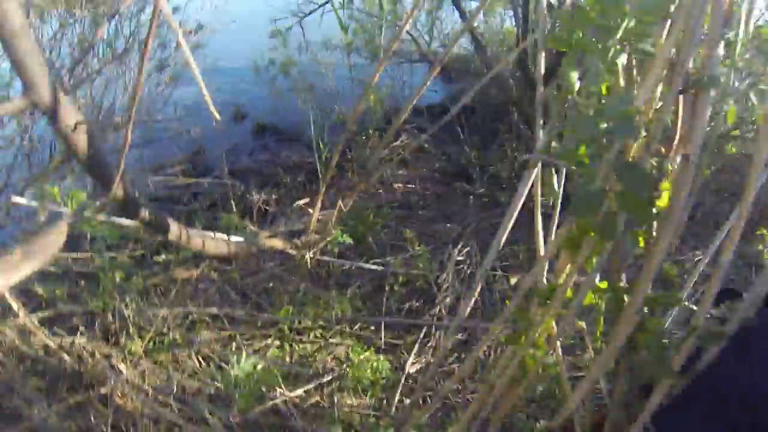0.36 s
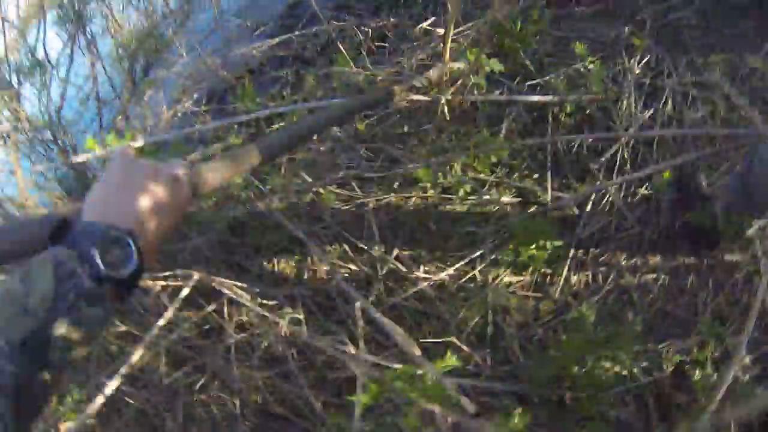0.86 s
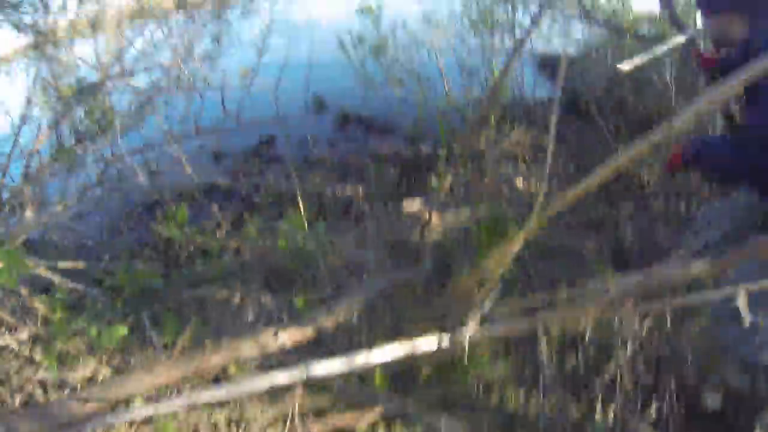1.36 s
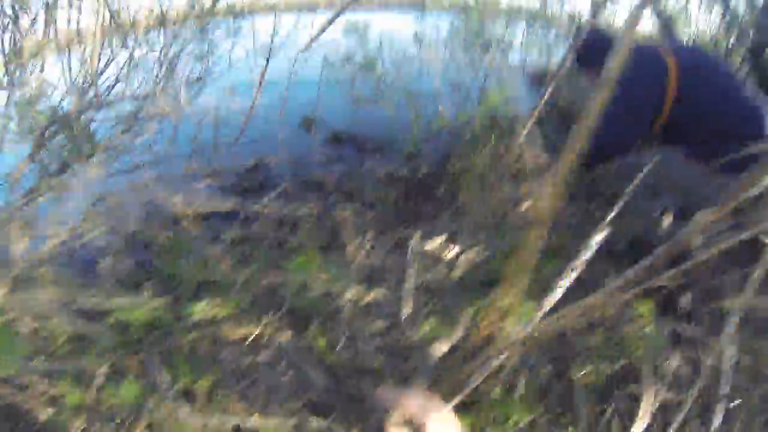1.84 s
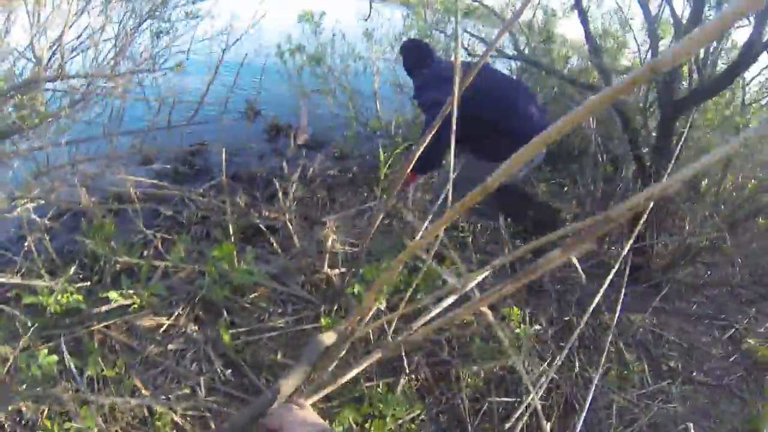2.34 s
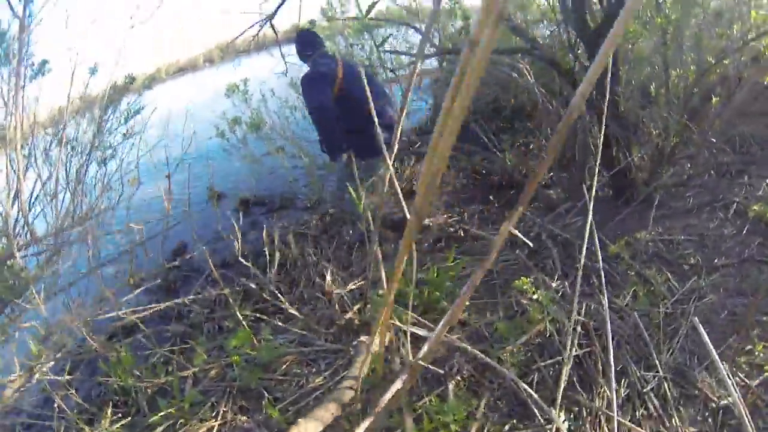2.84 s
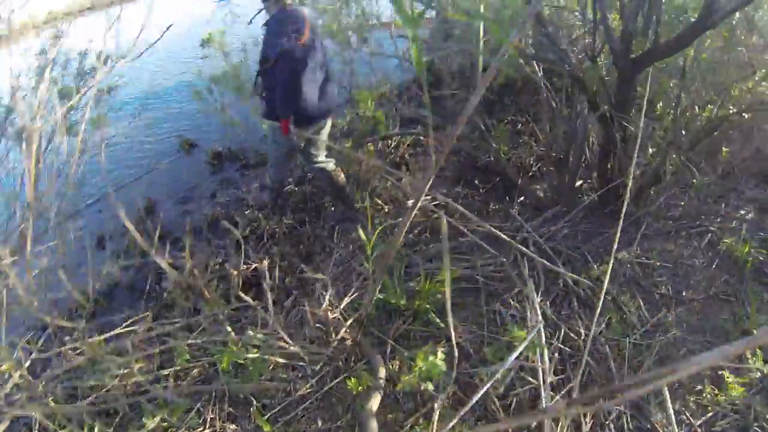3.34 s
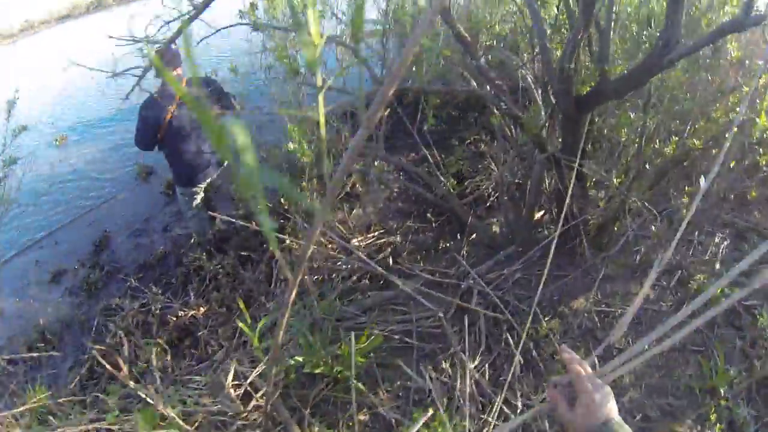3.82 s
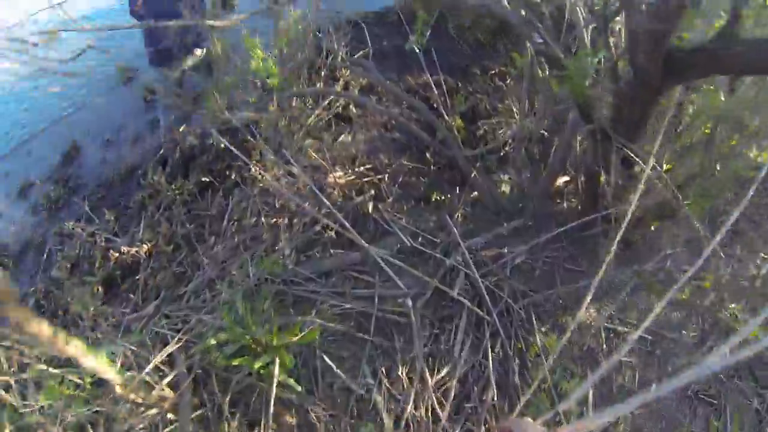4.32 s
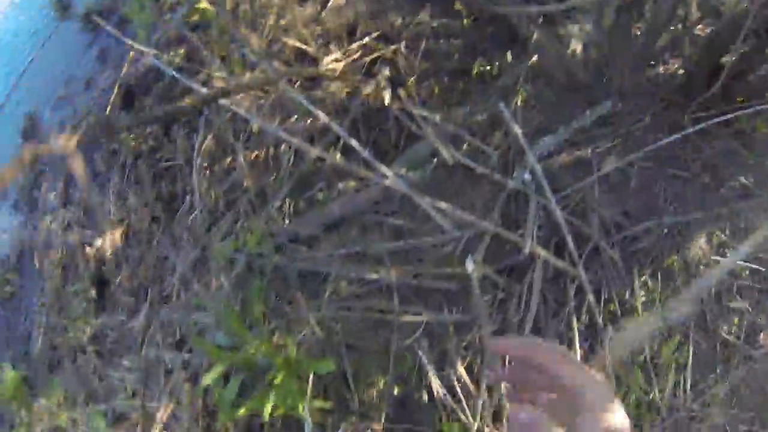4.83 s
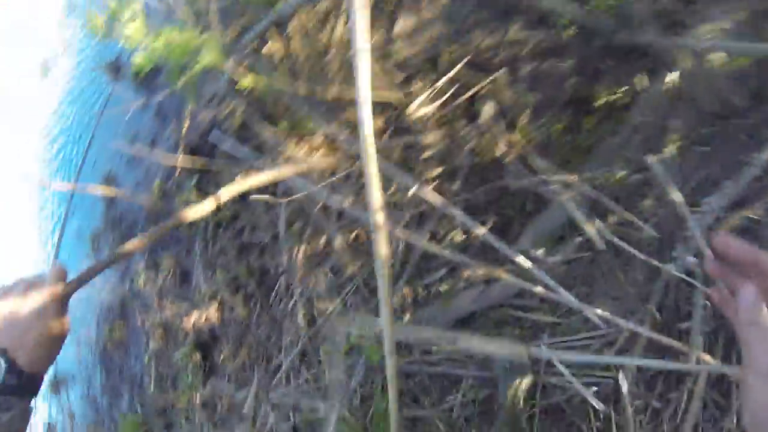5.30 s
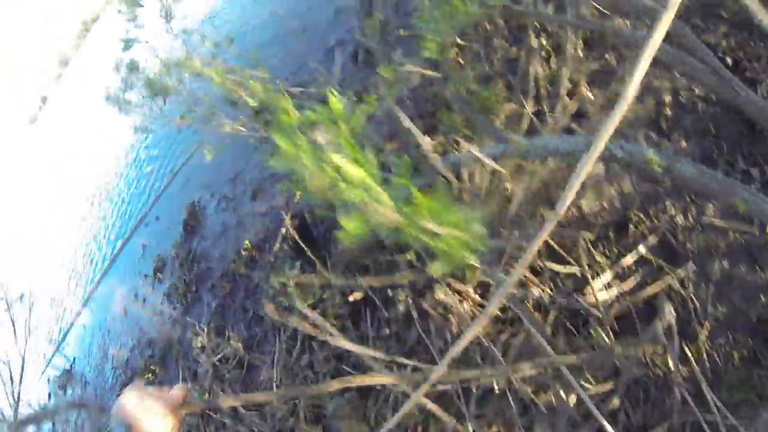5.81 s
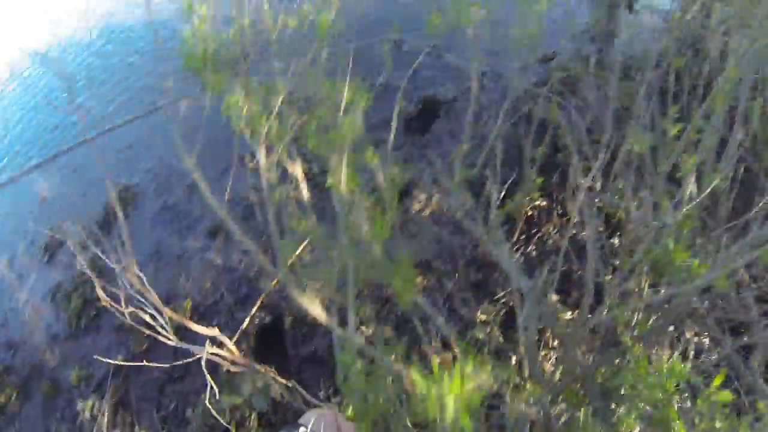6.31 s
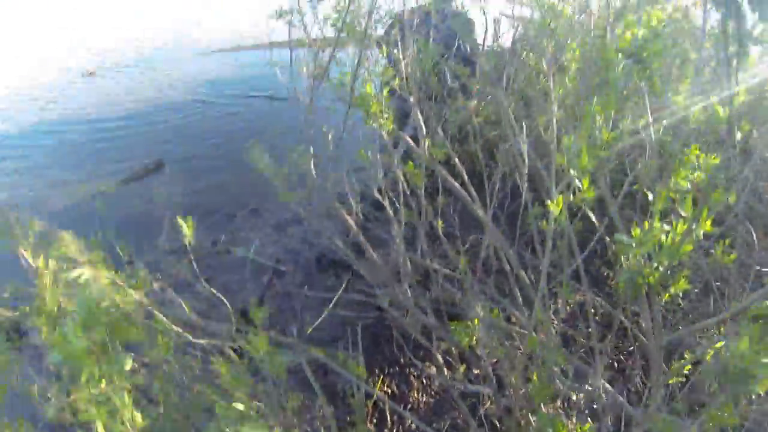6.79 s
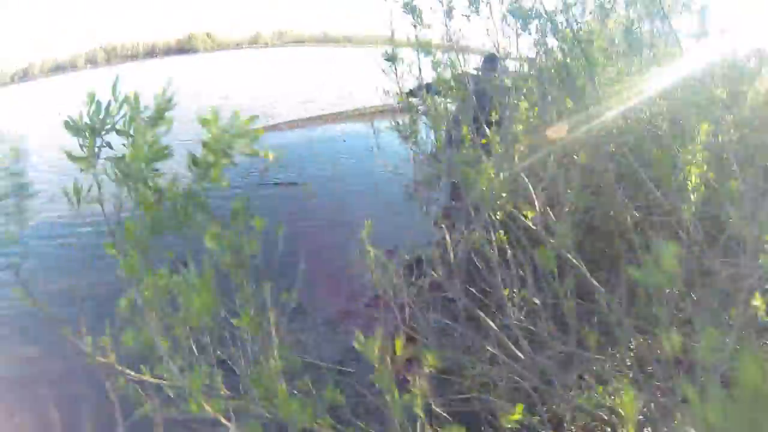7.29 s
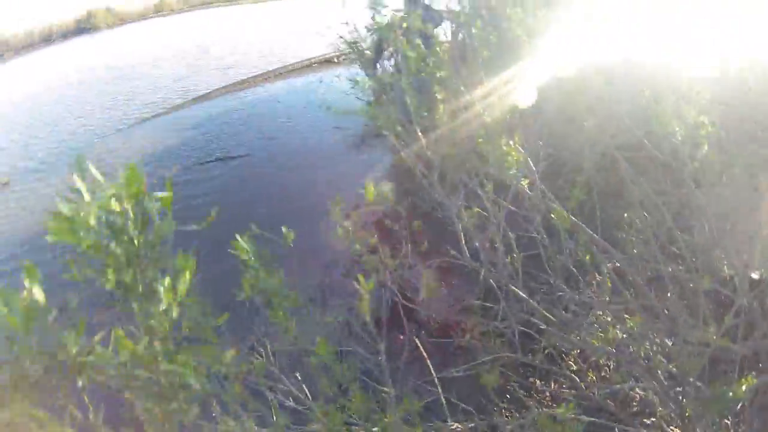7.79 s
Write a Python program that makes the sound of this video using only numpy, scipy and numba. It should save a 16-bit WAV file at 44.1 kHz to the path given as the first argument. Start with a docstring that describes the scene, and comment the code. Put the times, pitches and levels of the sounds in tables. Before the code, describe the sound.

Someone forces a way through dry cane on a bank. Heard through a small boxy housing worn on the head: bright brittle snaps, leaf rustle, hollow rattling knocks and scrapes crowded at the start, then low wind thumps and rumble between gusts. From two seconds a hog growls at intervals in the background. More snaps cluster around the middle and later; two short rising squeals come late, among softer crackle.

```python
"""In dry cane beside still water, a small head-worn camera hears through its plastic housing.
Twigs snap in reach from the start over crackling litter and leaves; stalks soon drag, whip past and knock
on the housing, then wind slaps the port between gusts. From two seconds on a hog growls further off,
and late on it squeals twice. Breaks and knocks are excited resonances, litter is random crackle, wind is
shaped noise and the growl is throat pulses; the camera's gain ducks under loud peaks, such as hard slaps."""
import sys
import numpy as np
from scipy import signal
from scipy.fft import rfft, irfft
from scipy.io import wavfile
from scipy.ndimage import uniform_filter1d
from numba import njit

SR = 44100
rng = np.random.default_rng(int(sys.argv[2]) if len(sys.argv) > 2 else 0)


def voltage_ratio(level):
    """Linear amplitude factor for a level in decibels (scalar or array-like)."""
    return 10 ** (np.asarray(level, float) / 20)


def generate_wav(sig):
    """Save sig (samples, or channels by samples) to the path in sys.argv[1] as 16-bit PCM at SR."""
    pcm = np.round(np.clip(np.atleast_2d(sig).T, -1, 1) * 32767).astype(np.int16)
    wavfile.write(sys.argv[1], SR, pcm)


N = 359415
T = np.arange(N) / SR


# twigs breaking close by, outside the housing: [t/s, ring peak level/dB, ring f/Hz, crack level against ring/dB]
TWIG_BREAKS = [(0.016, -16.5, 2400, 1), (0.101, -22.5, 3530, -7), (0.344, -9, 2800, -4),
               (0.525, -16, 1950, -5), (0.597, -13.5, 2800, 1), (0.6504, -22, 1590, -35),
               (0.771, -8, 2430, -1), (1.12, -35.5, 3940, 10), (1.2248, -11.5, 2170, -0.5),
               (1.268, -27.5, 4000, 6.5), (1.2978, -19, 2200, -20), (1.637, -29.5, 3650, 5),
               (1.7052, -12, 1830, -5), (1.796, -24, 3720, 6), (2.2769, -12, 2530, -44),
               (2.418, -22, 2450, -70), (2.443, -29, 2870, 4), (2.535, -10, 2770, -11),
               (2.637, -12, 3100, -0.5), (2.6735, -13, 3040, -8.5), (2.691, -13, 1870, -3),
               (2.918, -24.5, 4900, -1.5), (3.0005, -22, 1950, 2), (3.0306, -24.5, 4460, 7),
               (3.339, -25.5, 2430, -28), (3.4936, -26.5, 2000, -35), (3.5642, -26.5, 2300, -10),
               (3.615, -37, 3810, 11), (3.6577, -16.5, 2600, -27), (3.76, -25.5, 2410, 0),
               (3.7993, -27, 1850, -10), (3.849, -28.5, 1940, -3.5), (4.1135, -27.5, 2120, -0.5),
               (4.248, -33.5, 1630, 9.5), (4.4293, -33.5, 2500, -16), (4.4937, -8, 1850, -2),
               (4.5156, -8.5, 2000, -1.5), (4.579, -17, 4700, 2), (4.6225, -17, 1570, -2),
               (5.002, -21, 2580, 9), (5.139, -29.5, 1960, 5), (5.2014, -11, 3400, -12),
               (5.249, -26, 3300, -1), (5.3031, -20.5, 2180, 0.5), (5.5562, -16, 2500, -10.5),
               (5.637, -17, 2650, -2.5), (5.676, -13.5, 2800, -8), (5.704, -13.5, 2980, 2),
               (5.733, -15, 2560, 0.5), (5.9608, -19, 1590, -7), (6.18, -34, 3280, 4),
               (6.2787, -31, 1740, 3.5), (6.3963, -19.5, 4050, -31), (6.434, -24, 4200, 0),
               (6.81, -27, 2360, 7.5), (6.976, -32, 2860, 5), (7.4, -30.5, 1590, -23),
               (7.667, -27.5, 5330, -17), (8.128, -30, 2600, -31)]


def snaps():
    """A break is a sharp click and splintering noise; the hollow twig rings, the brush scatters a tail."""
    out, t = np.zeros(N), T[:4410]
    for s, peak_db, hz, crack_db in TWIG_BREAKS:
        noise = rng.standard_normal((2, len(t)))
        fall = np.exp(-t / (0.011 + 0.000083 * max(peak_db + 52.0, 0)))  # big breaks splinter longer
        envelope = np.exp(-t / 0.0015) + 0.22 * fall * noise[0, ::-1] ** 2
        splinters = noise[0] * envelope
        click = 4.6 * (t == 0)
        body = ring(splinters + click, hz, 320) + 0.5 * ring(splinters, 2760, 1520)
        body = ring(body, hz, 2.13 * hz)  # the wood damps the far treble
        crack = ring(noise[1] * envelope, 3740, 5700)
        both = body / np.abs(body).max() + voltage_ratio(crack_db) * crack / np.abs(crack).max()
        add(out, s, voltage_ratio(peak_db) * both)
    return out


# how hard the walker treads and pushes: [t/s, litter level/dB]
TREAD_LEVEL = [(0.0, -28.5), (0.13, -39.5), (0.36, -56), (0.5, -36.5), (1.04, -44.5), (1.25, -43.5),
               (1.43, -45.5), (1.86, -48), (2.56, -43), (3.13, -50.5), (4.88, -46), (5.13, -40),
               (5.49, -45), (5.72, -41.5), (6.56, -47), (7.01, -45), (7.35, -51.5), (8.15, -48.5)]
# rings of small twigs underfoot: [f/Hz]
SMALL_TWIG_HZ = [1743, 2690, 3480, 4460]
# tone of the crackling litter: [f/Hz, filter level/dB]
LITTER_TONE = [(200, 6), (500, 3), (1200, 4), (2500, 6), (4000, -1.5), (6000, -16.5)]
# tone of the ticking leaves: [f/Hz, filter level/dB]
LEAF_TONE = [(3000, -5), (5000, -4), (7500, -10.5), (10000, -10), (12500, -16.5), (15000, -50)]
LEAVES_DB, LEAVES_PER_TREAD = -9, 0.043  # leaves against litter at a tread of -45 dB; dB per dB
LITTER_SHAKE_DB, SHAKE_DB = -69, -37  # litter and leaves shaken around each break, against its peak
SHAKE_BUILD_S, SHAKE_SETTLE_S = 0.004, 0.064
SHAKE_PER_CRACK = 0.45  # crisp breaks shake the leaves more; dB per dB


def rustle():
    """Small twigs break, each size with its ring; litter crackles and leaves tick over a finer, patchy bed."""
    tread_db = np.interp(T, *np.transpose(TREAD_LEVEL))
    breaks = [crackle(45, 3.5, 0.002) for hz in SMALL_TWIG_HZ]
    # the ring of each twig class jumps in pitch every 1000 samples
    pitches = [voltage_ratio(1.2 * np.repeat(rng.standard_normal(N // 1000 + 1), 1000)[:N]) for hz in SMALL_TWIG_HZ]
    twigs = np.zeros(N)
    for tiny_breaks, hz, pitch in zip(breaks, SMALL_TWIG_HZ, pitches):
        ringing = ring(ring(tiny_breaks, hz * pitch, 0.054 * hz), hz * pitch, hz)
        twigs += SMALL_TWIG_HZ[0] / hz * unit(ringing)
    bed = colour(voltage_ratio(2.8 * walk(26)) * crackle(1100, 7, 0.003), LITTER_TONE)
    litter = bed + 0.27 * twigs
    patches = voltage_ratio(4.5 * walk(18))
    ticks = 0.25 * sum(breaks) + patches * 0.7 * crackle(220, 7, 0.0012)
    leaves = colour(ticks + 0.13 * rng.standard_normal(N), LEAF_TONE)
    stirred = voltage_ratio(tread_db + LEAVES_DB + LEAVES_PER_TREAD * (tread_db + 45))
    shaken = around(TWIG_BREAKS, SHAKE_BUILD_S, SHAKE_SETTLE_S)
    crisp_events = [(s, db + SHAKE_PER_CRACK * crack_db) for s, db, hz, crack_db in TWIG_BREAKS]
    crisp = around(crisp_events, SHAKE_BUILD_S, SHAKE_SETTLE_S)
    litter_level = voltage_ratio(tread_db) + voltage_ratio(LITTER_SHAKE_DB) * shaken
    leaf_level = stirred + voltage_ratio(SHAKE_DB) * crisp
    return litter_level * litter + leaf_level * leaves


# stalks knocking on the housing itself: [t/s, stalk peak level/dB, ring f/Hz]
STALK_KNOCKS = [(0.358, -4.5, 2020), (0.3639, -3, 2030), (0.401, -9.5, 1460), (0.434, -18.5, 1150),
                (0.466, -29, 1500), (0.659, -13.5, 1590), (0.681, -9, 1330), (0.746, -19.5, 1000),
                (0.834, 4, 1950), (1.027, -11.5, 1390), (1.042, -28, 1400), (1.057, -25, 1490),
                (1.082, -14, 2010), (1.091, -15.5, 1470), (1.099, -16, 1900), (1.11, -12.5, 1450),
                (1.193, -14, 1670), (1.216, -12, 1380), (1.225, -14, 960), (1.252, -24, 1550),
                (1.326, -9, 656), (1.3255, -14.5, 1240), (1.335, -11, 1360), (1.349, -17.5, 2170),
                (1.372, -12, 1280), (1.387, -21, 1410), (1.414, -14.5, 1140), (1.426, -16, 1450),
                (1.448, -14.5, 1390), (1.484, -20, 1480), (1.627, -25.5, 1450), (5.175, -35, 1900),
                (5.202, -16.5, 1600), (5.205, -12.5, 1230), (5.213, -15.5, 1340), (5.221, -20, 1720),
                (5.234, -25, 1490)]
# low shudder of the housing around each knock, against its peak
JOLT_DB, JOLT_BUILD_S, JOLT_SETTLE_S = -19, 0.006, 0.028


def knocks():
    """A blunt push rings the stalk for a few cycles and wakes the housing wall; the housing shudders."""
    out, t = np.zeros(N), T[:2205]
    for s, peak_db, hz in STALK_KNOCKS:
        push = np.exp(-t / 0.0007) * (1 + 0.49 * rng.standard_normal(len(t)))
        push = push + 0.14 * np.exp(-t / 0.0093) * rng.standard_normal(len(t))
        stalk = ring(ring(push, hz, 0.2 * hz), hz, 0.45 * hz)
        bark = ring(np.exp(-t / 0.001) * rng.standard_normal(len(t)), 2300, 1800)  # cracks at the contact
        stalk = stalk + 0.12 * bark
        wall = shell(push)
        wall_level = 0.46 * voltage_ratio(2 * rng.standard_normal())
        both = stalk / np.abs(stalk).max() + wall_level * wall / np.abs(wall).max()
        add(out, s, voltage_ratio(peak_db) * both)
    jolts = around(STALK_KNOCKS, JOLT_BUILD_S, JOLT_SETTLE_S)
    return out + voltage_ratio(JOLT_DB) * jolts * colour(rng.standard_normal(N), FLUTTER_TONE)


# modes of the housing wall: [f/Hz, width f/Hz, level/dB]
WALL_MODES = [(670, 95, 12.5), (1150, 110, 10), (1450, 610, 10), (1950, 300, -14.5)]


def shell(push):
    """The housing wall rings in its modes."""
    return sum(voltage_ratio(db) * ring(ring(push, hz, w), hz, 3 * w) for hz, w, db in WALL_MODES)


# a stalk dragging over the housing: [start t/s, length t/s, wall jerk level at the hardest press/dB]
STALK_SCRAPES = [(0.272, 0.22, -31), (0.62, 0.21, -29.5), (0.947, 0.228, -32.5), (1.19, 0.224, -36.5)]
SCRAPE_PEAK_AT, SCRAPE_EDGE_DB = 0.46, -3  # share of the length; press at both ends against the peak
SCRAPE_RUMBLE_DB = 1.5  # low shudder of the housing, against the wall jerks


def scrapes():
    """Stick-slip jerks of bark on plastic."""
    jerks, out = unit(shell(crackle(400, 3.2, 0.0015))), np.zeros(N)
    jerks = jerks + voltage_ratio(SCRAPE_RUMBLE_DB) * colour(crackle(60, 10.4, 0.0014), FLUTTER_TONE)
    for s, length, db in STALK_SCRAPES:
        press_at, press = [0, SCRAPE_PEAK_AT, 1], [SCRAPE_EDGE_DB, 0, SCRAPE_EDGE_DB]
        press_db = np.interp((T - s) / length, press_at, press)
        fade = np.clip(np.minimum(T - s, s + length - T) / 0.048, 0, 1)
        out += fade * voltage_ratio(db + press_db) * jerks
    return out


# thin twigs whipping past the head: [t/s, length t/s, start f/Hz, end f/Hz, level/dB]
TWIG_WHIPS = [(0.306, 0.055, 720, 1170, -28.5), (0.403, 0.03, 1300, 1120, -29),
              (0.44, 0.025, 1200, 1080, -35), (0.872, 0.03, 800, 1080, -41), (0.9, 0.056, 740, 1050, -37)]


def whips():
    """Thin twigs cut the air with short whistles."""
    return whistles(TWIG_WHIPS, 0.007)


def whistles(rows, wobble):
    """A thin tone that glides quickly, levels off, flutters and wobbles in pitch by a share of its end."""
    out = np.zeros(N)
    for s, length, hz0, hz1, db in rows:
        u = T[:int(length * SR)] / length
        glide = hz0 + (hz1 - hz0) * (1 - (1 - u) ** 3.4)
        hz = glide + wobble * hz1 * walk(150)[:len(u)]
        tone = np.sin(2 * np.pi * np.cumsum(hz) / SR)
        swell = np.sin(np.pi * np.sqrt(u))
        flutter = voltage_ratio(3 * walk(82)[:len(u)])
        add(out, s, voltage_ratio(db) * tone * swell * flutter)
    return out


# wind slapping the port, as strong as it arrives: [t/s, level/dB]
WIND_SLAPS = [(0.527, -5), (0.757, -2), (0.776, 5.5), (1.133, -7), (1.274, -8.5), (1.425, -0.5),
              (1.503, -8.5), (1.658, -16), (1.732, -13.5), (1.743, 6.5), (1.853, -7.5), (2.027, -13.5),
              (2.252, -15), (3.91, -16.5), (4.724, -1), (4.868, -11), (5.555, -12.5), (5.617, -16)]
# gusts on the port: [t/s, rumble level/dB]
GUST_LEVEL = [(0.12, -12), (3.21, -24.5), (3.25, -32.5), (3.79, -16.5), (4.46, -28.5), (4.52, -16),
              (5.75, -22.5), (5.96, -15), (6.23, -24), (6.67, -14), (7.05, -32), (7.16, -14.5),
              (7.39, -26.5), (8.15, -25)]
# tone of the slow pressure swell: [f/Hz, filter level/dB]
RUMBLE_TONE = [(3, -32.5), (6, 0.5), (16, 1.5), (30, -0.5), (60, -25), (120, -38), (300, -81)]
# tone of the flutter, also of the shuddering housing: [f/Hz, filter level/dB]
FLUTTER_TONE = [(30, -45), (60, -1.5), (150, -7), (260, -10.5), (400, -14), (700, -58)]
FLUTTER_DB, FLUTTER_PER_GUST = -60.5, 2.37  # flutter in a gust of -20 dB; dB per dB
# flutter around each slap: level against the slap, build-up and settling
EDDY_DB, EDDY_BUILD_S, EDDY_SETTLE_S = -33, 0.07, 0.035
SLAP_MS = 6.44  # time scale of a slap


def wind():
    """Slow pressure swell, flutter in puffs on its crests, and slaps that push the diaphragm out and far back."""
    gust_db = np.interp(T, *np.transpose(GUST_LEVEL))
    eddies = voltage_ratio(EDDY_DB) * around(WIND_SLAPS, EDDY_BUILD_S, EDDY_SETTLE_S)
    flutter_level = voltage_ratio(FLUTTER_DB + FLUTTER_PER_GUST * (gust_db + 20)) + eddies
    swell = colour(rng.standard_normal(N), RUMBLE_TONE)
    puffs = voltage_ratio(2 * walk(14)) * (0.4 + np.tanh(swell) ** 2)
    flutter = colour(puffs * rng.standard_normal(N), FLUTTER_TONE)
    out = voltage_ratio(gust_db) * swell + flutter_level * flutter
    for s, peak_db in WIND_SLAPS:
        u = T[:4410] * 1000 / SLAP_MS
        rush = unit(ring(rng.standard_normal(len(u)), 280, 93))  # air rushing past the rim
        puff = 0.045 * rush * u * np.exp(-u / 1.1)
        push_out = 6 * u ** 2 * np.exp(-(2.06 * u) ** 2)
        pull_back = 4.17 * u ** 2 * np.exp(-1.4 * u)
        slow_return = 0.14 * u ** 2 * np.exp(-0.6 * u)
        add(out, s, voltage_ratio(peak_db) * (puff + push_out - pull_back + slow_return))
    return out


# hog growls further off: [start t/s, length t/s, lowest throat resonance before the mouth opens f/Hz,
# level of that resonance at the swell's peak/dB, upper resonances against it level/dB]
HOG_GROWLS = [(2.082, 0.57, 425, -49.5, 1.5), (2.9, 0.65, 325, -60.5, -3), (3.76, 0.39, 376, -53, 1),
              (5.601, 0.42, 300, -53, 17), (6.135, 0.27, 500, -50.5, 5), (6.71, 0.66, 368, -47.5, 1.5),
              (7.582, 0.8, 319, -46, 5)]
# upper throat resonances: [f/Hz before the mouth opens, width f/Hz, level/dB, level change by the end/dB]
UPPER_THROAT = [(1087, 64, -7.5, -5.5), (1630, 290, -7, -26), (2595, 200, -13, 5.5)]
GROWL_HZ, GROWL_JITTER = 55.87, 0.11  # pulse rate; spread as a share of it
GROWL_RASP, GROWL_WEAK_DB = 0.5, 6  # noise against pulses; every second pulse is weaker
MOUTH_OPEN_HZ, MOUTH_OPENS_S, MOUTH_SPREAD_S = 507, 0.31, 0.11  # S-curve of the resonance towards this
ONSET_HZ, ONSET_S = 114, 0.08  # each growl starts higher and sags
UPPER_FOLLOW = 0.093  # exponent by which the upper resonances follow the lowest
GROWL_SWELL_DB, GROWL_PEAK_AT = 7, 0.59  # start below the peak; peak at this share of the length


def hog():
    """Slow uneven throat pulses with rasp; the lowest resonance rises as the mouth opens."""
    phase = np.cumsum(GROWL_HZ * (1 + GROWL_JITTER * walk(40))) / SR
    cycle = phase.astype(int)
    count = cycle[-1] + 1
    pulse_db = 4.5 * rng.standard_normal(count) - GROWL_WEAK_DB * (np.arange(count) % 2)
    pulses = np.diff(cycle, prepend=0) * voltage_ratio(pulse_db)[cycle]
    rasp = np.exp(-(phase % 1) / 1.7) * rng.standard_normal(N)
    source = unit(pulses) + GROWL_RASP * unit(rasp)
    out = np.zeros(N)
    for s, length, hz, db, upper_db in HOG_GROWLS:
        u = np.clip((T - s) / length, 0, 1)
        fade = np.clip(np.minimum(T - s, s + length - T) / 0.014, 0, 1)
        age = length * u
        opening = (MOUTH_OPEN_HZ - hz) / (1 + np.exp((MOUTH_OPENS_S - age) / MOUTH_SPREAD_S))
        low_hz = hz + ONSET_HZ * np.exp(-age / ONSET_S) + opening
        lift = (low_hz / hz) ** UPPER_FOLLOW
        upper = np.zeros(N)
        for f, w, level_db, change_db in UPPER_THROAT:
            resonance = unit(ring(ring(source, f * lift, w), f * lift, 2 * w))
            upper += voltage_ratio(level_db + change_db * u) * resonance
        lowest = unit(ring(ring(source, low_hz, 69), low_hz, 95))
        overtone = 0.39 * u * unit(ring(ring(source, 1.92 * low_hz, 63), 1.79 * low_hz, 120))
        swell = voltage_ratio(db - GROWL_SWELL_DB * ((u - GROWL_PEAK_AT) / GROWL_PEAK_AT) ** 2)
        out += fade * swell * (lowest + overtone + voltage_ratio(upper_db) * upper)
    return out


# brief squeals of the hog: [t/s, length t/s, start f/Hz, end f/Hz, level/dB]
HOG_SQUEALS = [(6.2, 0.14, 1520, 1620, -49.5), (7.11, 0.065, 1640, 1720, -48.5)]


def squeals():
    """The hog squeals in thin rising tones of unsteady pitch."""
    return whistles(HOG_SQUEALS, 0.035)


def circuit_whine():
    """A faint, slightly drifting tone from the camera's circuit."""
    hz = 10650 + 25 * walk(40)
    return voltage_ratio(-70) * np.sin(2 * np.pi * np.cumsum(hz) / SR)


# air modes and dips of the housing around the microphone: [f/Hz, width f/Hz, level/dB]
HOUSING_MODES = [(667, 17, 4), (798, 105, -5.5), (1050, 98, 4.5), (1590, 73, 7), (2010, 200, 3.5),
                 (2800, 63, 5), (4730, 130, 4.5), (6100, 250, 5)]


def through_housing(air):
    """The cavity of the housing lifts and dips bands of the airborne sound."""
    return shape(air, lambda f: sum(db / (1 + (2 * (f - hz) / w) ** 2) for hz, w, db in HOUSING_MODES))


def unit(x):
    """Scale to rms 1."""
    return x / np.sqrt(np.mean(x ** 2))


def shape(x, db_at):
    """Causal filter whose gain in dB is db_at(Hz), built from the cepstrum."""
    size = 2 ** 15
    c = irfft(db_at(np.fft.rfftfreq(size, 1 / SR) + 1) * np.log(10) / 20)
    c[1:size // 2] *= 2  # fold to minimum phase
    c[size // 2 + 1:] = 0
    return signal.fftconvolve(x, irfft(np.exp(rfft(c))))[:len(x)]


def colour(x, points):
    """Filter along (Hz, dB) points, then scale to rms 1."""
    hz, db = np.transpose(points)
    return unit(shape(x, lambda f: np.interp(np.log(f), np.log(hz), db)))


def ring(x, hz, width):
    """Two-pole resonance; hz may move, gain 1 at the centre."""
    return svf(x, hz + np.zeros(len(x)), float(width))


@njit
def svf(x, hz, width):
    """State-variable band-pass."""
    y, band, low = np.empty(len(x)), 0., 0.
    for i in range(len(x)):
        g, k = np.tan(np.pi * hz[i] / SR), width / hz[i]
        v = (band + g * (x[i] - low)) / (1 + g * (g + k))
        band, low, y[i] = 2 * v - band, low + 2 * g * v, k * v
    return y


def walk(rate):
    """Random levels held 1 / rate s and slewed twice; spread 1."""
    k = int(SR / rate)
    steps = np.repeat(rng.standard_normal(N // k + 1), k)
    return unit(uniform_filter1d(uniform_filter1d(steps, k), k)[:N])


def add(out, s, x):
    """Mix x into out from time s."""
    i = int(s * SR)
    out[i:i + len(x)] += x[:N - i]


def crackle(per_s, spread_db, tail_s):
    """Random tiny breaks of very unequal size, each with a short noisy tail."""
    hits = rng.random(N) < per_s / SR
    sizes = hits * voltage_ratio(spread_db * np.minimum(rng.exponential(size=N), 3))
    power = signal.lfilter([1], [1, -np.exp(-1 / (tail_s * SR))], sizes ** 2)
    return unit(np.sqrt(power) * rng.standard_normal(N))


def around(events, build_s, settle_s):
    """Envelope that builds up to each (s, peak dB) event and settles after it; events add in power."""
    power = np.zeros(N)
    for event in events:
        s, peak_db = event[0], event[1]
        distance = np.maximum((s - T) / build_s, (T - s) / settle_s)
        power += voltage_ratio(2 * peak_db) * np.exp(-2 * distance)
    return np.sqrt(power)


@njit
def gain_control(x, top, attack, release):
    """Gain falls within milliseconds when the sound passes the top and creeps back."""
    y, level = np.empty(len(x)), 0.
    for i in range(len(x)):
        level += (abs(x[i]) - level) * (attack if abs(x[i]) > level else release)
        y[i] = x[i] * top / max(level, top)
    return y


def scene():
    """Airborne sounds pass through the housing; contact sounds, wind and a faint circuit whine do not."""
    air = snaps() + rustle() + whips() + hog() + squeals()
    return (through_housing(air) + knocks() + scrapes() + wind() + circuit_whine())[None]


def band_limit(x):
    """A steep low-pass at the top of the band."""
    return signal.sosfilt(signal.butter(12, 16290, fs=SR, output="sos"), x)


def record(dry):
    """The camera's gain control, soft overload and a steep top cut."""
    held = gain_control(dry[0], 0.32, 1 / (0.0026 * SR), 1 / (0.084 * SR))  # 2.6 ms down, 84 ms back
    overloaded = 0.8 * np.tanh(held / 0.8)
    top_cut = signal.butter(16, 14600, fs=SR, output="sos")
    mix = signal.sosfilt(top_cut, overloaded)[None]
    return band_limit(mix)


dry = scene()
out = record(dry)
generate_wav(out)
```